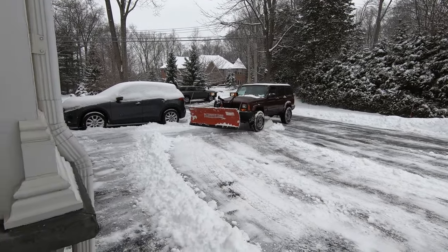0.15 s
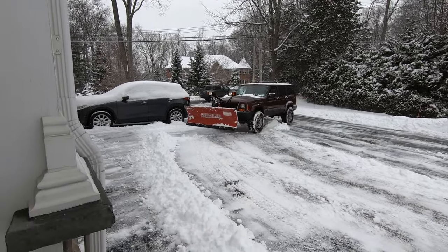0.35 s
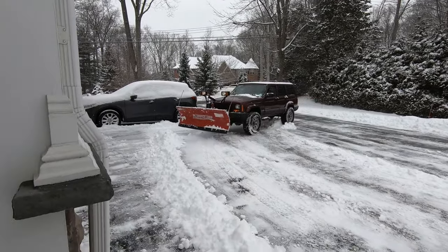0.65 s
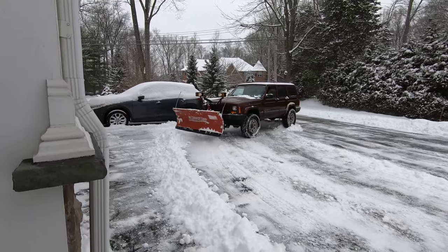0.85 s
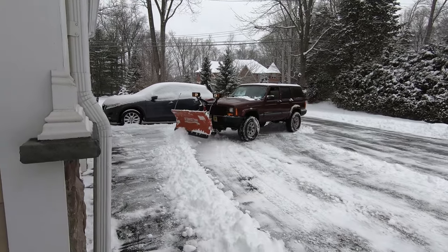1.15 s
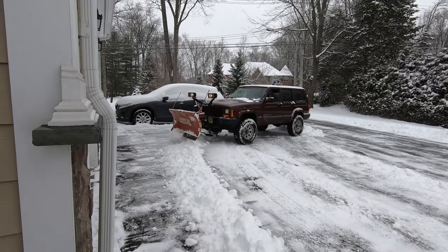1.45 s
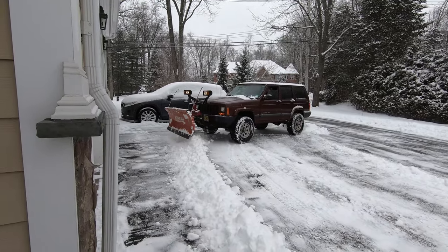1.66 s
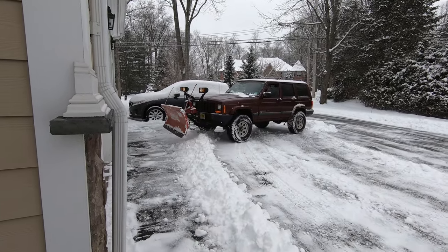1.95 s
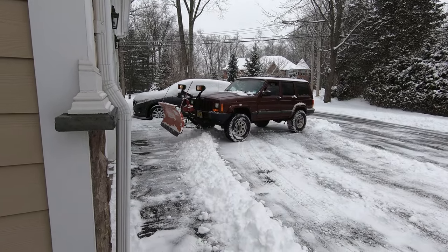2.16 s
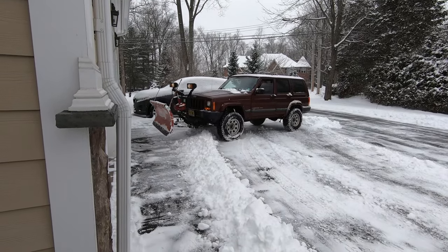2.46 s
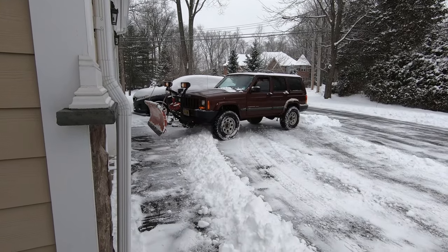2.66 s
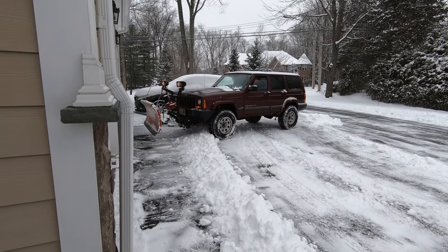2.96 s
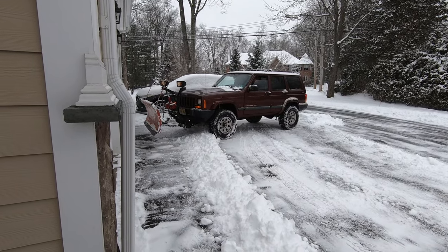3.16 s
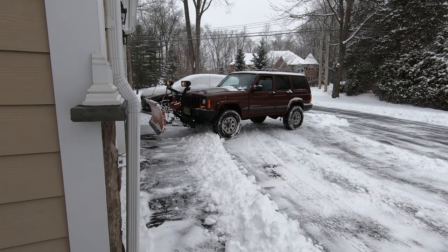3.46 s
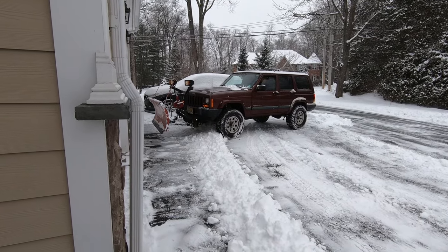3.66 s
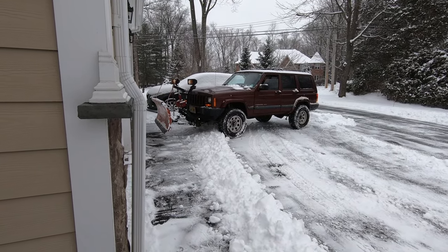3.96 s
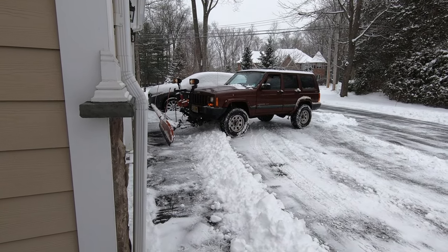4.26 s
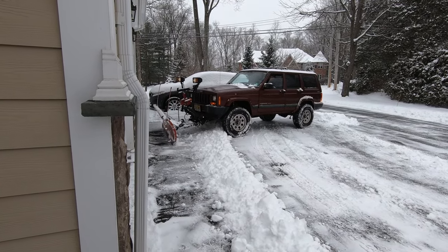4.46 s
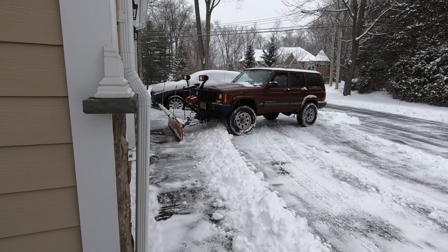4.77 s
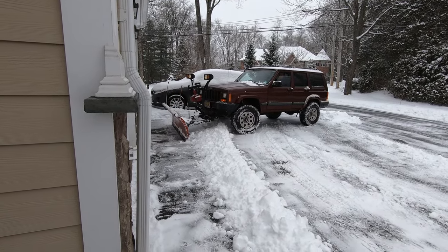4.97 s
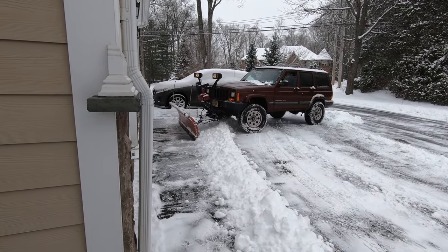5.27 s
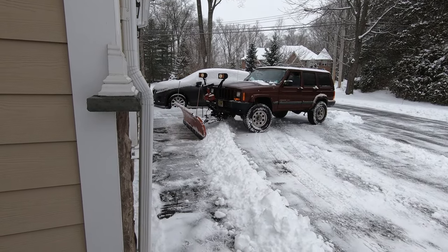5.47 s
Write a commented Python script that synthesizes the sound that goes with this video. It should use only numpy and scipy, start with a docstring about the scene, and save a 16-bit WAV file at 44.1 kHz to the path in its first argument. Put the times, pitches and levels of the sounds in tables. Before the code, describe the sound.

Outdoors in a snowy yard, heard from some metres away near a house wall: an old four-wheel drive booms and flutters, tyres hissing and crackling on snow. Loose metal knocks come in a cluster, then again after a brief pump whine. A calmer low idle follows. Finally the plow blade drops with a heavy thud and clang, and the engine pulls harder over rough, ringing scraping with repeated bumps.

```python
"""An exhaust booms and sags as a four-wheel drive with a front plow creeps up a snowy driveway.
Belts, intake and steering pump whine over hissing tyres, and the raised plow clunks in its mount. Then the
steel blade drops with a crunch of packed snow, and the engine pulls harder as the edge scrapes and judders.
Exhaust and whines are sine waves, most of them tied to the turning shaft; blows ring as fading sines;
rolling, crunching and scraping are random noise shaped by colours and resonances."""
import sys
import numpy as np
from scipy import signal
from scipy.fft import rfft, irfft, next_fast_len
from scipy.io import wavfile
from scipy.ndimage import uniform_filter1d, map_coordinates

SR = 44100
rng = np.random.default_rng(int(sys.argv[2]) if len(sys.argv) > 2 else 0)


def log_audio(samples):
    """Write samples as a 16-bit WAV file to the path given in sys.argv[1]."""
    # one column per channel
    frames = np.atleast_2d(samples).T
    # limit to full scale, then quantise
    limited = np.clip(frames, -1, 1)
    pcm = np.round(limited * 32767).astype(np.int16)
    wavfile.write(sys.argv[1], SR, pcm)


N = 247842

# In these tables a dB level is relative: the layer's own function may trim it.
# "Fade time" is the time to fall by 60 dB. A "colour" is a noise spectrum.

# Space and stereo.
# How alike left and right are. Each row: pitch in Hz, likeness (1 is identical).
STEREO_LIKENESS = [(300, .99), (500, .84), (1000, .82), (2200, .95), (4000, .72), (8000, .25)]
# Stereo balance. Each row: pitch in Hz, left minus right in dB.
BALANCE = [(100, -.35), (280, -.4), (600, 1.3), (1200, -.4), (2300, .7), (4500, -3), (8000, -1.5),
           (12000, 0)]
# Echo of the yard. Each row: pitch in Hz, fade time in seconds.
YARD_FADE = [(150, 0.89), (1500, 0.21), (9000, 0.084)]
YARD_DB = -35.5
TOP_HZ = 10600  # almost nothing passes above this

# Rolling and engine noise.
# Levels while driving. Each row: time in seconds, engine bay in dB, tyre hiss in dB, exhaust burble in dB.
ROLLING_LEVELS = [(0.03, -47, -61.5, -51.5), (0.27, -44.5, -57.5, -51), (0.64, -47, -61.5, -47),
                  (0.86, -46, -58.5, -45), (1.15, -43.5, -54.5, -51), (1.36, -42.5, -54.5, -44.5),
                  (1.67, -45.5, -57, -46.5), (1.91, -48, -62.5, -45.5), (2.37, -50.5, -65, -51),
                  (3.2, -54.5, -68, -58.5), (3.86, -54, -67, -53), (4.36, -49.5, -60, -54),
                  (5.3, -48, -57.5, -39.5)]
BAY_DB, TYRES_DB, BURBLE_DB = 1, 2.5, 11.5  # added to those three columns
# Colour of the exhaust's gas puffs. Each row: pitch in Hz, level in dB per Hz.
BURBLE_COLOUR = [(22, -7), (45, 0.5), (100, 1), (160, -1), (230, -0.5), (300, -17), (380, -21.5),
                 (460, -29.5), (620, -15), (1200, -63.5)]
# Colour of the engine bay's clatter. Each row: pitch in Hz, level in dB per Hz.
BAY_COLOUR = [(230, -25.5), (350, -11.5), (450, -3.5), (560, -3.5), (720, -2.5), (950, -6.5), (1350, -7),
              (1750, -6.5), (2200, -13), (2750, -10.5), (3500, -13.5), (4500, -26.5), (6500, -43),
              (11000, -98)]
# Colour of tyres on snow. Each row: pitch in Hz, level in dB per Hz.
TYRE_COLOUR = [(2500, -34.5), (3600, -5), (5000, -7), (7200, -5), (8200, -14.5), (9500, -21.5),
               (11000, -34.5), (15000, -49)]
# Resonances of the air box. Each row: pitch in Hz, width in Hz, level in dB.
AIR_BOX = [(439, 53, 4.5), (537, 27, -7.5)]
INTAKE_DB = -55.5
# Small cracks under the tyres: how many a second, level over the hiss column, random scatter.
CRUMBLE_HZ, CRUMBLE_DB, CRUMBLE_SPREAD_DB = 4.5, 1.5, 2

# Engine speed and exhaust.
# Speed of the crankshaft. Each row: time in seconds, turns per second.
CRANK_SPEED = [(0.0, 25.96), (0.22, 25.52), (0.44, 28.84), (0.73, 25.2), (1.01, 21.49), (1.53, 21.43),
               (2.15, 19.68), (3.33, 19.19), (3.49, 18.3), (3.69, 18.77), (3.83, 21.12), (3.99, 22.46),
               (4.2, 21.84), (4.34, 22.75), (4.61, 26.83), (5.29, 27.67), (5.62, 29.23)]
WAVER = 0.0021  # the engine speed wavers by this share
# The note depends on engine speed. An order is a multiple of that speed.
# Each row: turns per second, order 2 in dB, order 3 in dB, order 4 in dB, overtones in dB.
EXHAUST_NOTE = [(19.4, -39.5, -66.5, -15.5, -42.5), (18.35, -45.5, -55, -13, -42),
                (21.37, -27, -56.5, -21.5, -36), (21.54, -33.5, -34.5, -22, -38.5),
                (24.45, -31.5, -27.5, -30, -38.5), (29.3, -20, -29.5, -31, -45.5)]
# What pushing snow adds. One number in dB for each of: order 2, order 3, order 4, overtones.
LOAD_BOOST_DB = [-4.5, 0, 7, -2.5]
LOAD_AT_S, LOAD_RISE_S = 4.315, 0.21  # the engine takes up the load of the blade
SURGE_DB = 0.3845  # order 2 swells as the engine picks up: dB per turn per s gained each second
# Uneven firing shakes the low orders. One number in dB for each of: order 2, order 3, order 4.
UNEVEN_FIRING_DB = [.8, 1.6, .4]
PULSE_SKEW = .8  # lean of the exhaust pulse, shared by its low orders, in radians
# Higher exhaust tones. Each row: multiple of the crank speed, level in dB.
EXHAUST_OVERTONES = [(3.5, 0.5), (4.5, -10), (5, 1), (6, 1), (7, -21.5), (8, -0.5), (9, -7.5), (10, 0.5),
                     (11, -10), (12, -4), (13, -5.5)]
# Resonances of the silencer. Each row: pitch in Hz, level in dB.
SILENCER = [(95, -2), (112, 3), (130, -7.5), (155, 1.5), (178, 4), (215, -10), (260, -17)]

# Whines of engine and steering pump.
# Whines tied to the crank: three from the belt drive, and the intake's hum at 24 times crank speed.
# Each row: pitch as a multiple of the crank speed, level in dB.
CRANK_WHINES = [(71.8, 0), (68.7, -8), (42.5, -1), (24, 0)]
# Resonances that make these whines louder. Each row: pitch in Hz, level in dB over the bay column.
WHINE_RESONANCES = [(425, -8), (442, 5), (462, -9), (600, -14), (665, -7), (800, -17), (980, -15),
                    (1130, -8), (1270, -2), (1345, -1.5), (1415, -7.5), (1570, -8), (1710, 1.5), (1860, 0),
                    (2050, -6.5)]
# How these whines come and go. Each row: time in seconds, level in dB.
WHINE_LEVELS = [(0, 0), (.06, 1), (.09, -5), (.3, -3), (.4, 1), (.47, 0), (.53, -6), (.59, -6), (.64, 1),
                (.7, -3), (.75, 1), (.88, 2), (.96, -3), (1.15, -1), (1.5, -4), (2, 0), (4.4, 0)]
# The steering pump during one turn of the wheel. Each row: time in seconds, pitch in Hz, level in dB.
STEERING = [(.80, 420, -70), (.84, 455, -51), (.89, 545, -49), (.92, 630, -50), (.96, 682, -48.5),
            (1.025, 744, -48.5), (1.11, 782, -46.5), (1.17, 798, -53), (1.26, 817, -55), (1.32, 808, -54),
            (1.38, 680, -46.5), (1.43, 605, -52), (1.49, 535, -55), (1.56, 450, -75), (1.6, 450, -120)]
PUMP_JITTER = .004  # the pump's pitch trembles by this share
# Resonances of the pump's hoses and bracket. Each row: pitch in Hz, level in dB.
PUMP_RESONANCES = [(430, 0), (535, 7), (620, -1), (780, -2), (880, -14), (1150, -12), (1350, -11),
                   (1440, -7), (1530, -1), (1650, -3), (1900, -17), (2150, -14), (2330, -5.5), (2480, -17),
                   (2880, -7), (3150, -10), (3400, -2), (3560, -7), (3720, -5), (3850, -14), (3940, -10),
                   (4020, -4), (4120, -5), (4300, -14)]

# The hanging plow.
# Jolts in the mount. Each row: start in seconds, thud in dB, ring in dB, rattle in dB.
CLUNK_HITS = [(.674, -20.5, -28, -41), (.738, -22, -24.5, -43), (0.771, -17, -45, -49),
              (.811, -24.5, -26.5, -36), (.859, -24.5, -42, -49), (.884, -33, -37, -48),
              (1.296, -35, -45, -39), (1.31, -26, -42, -35.5), (1.491, -17, -27, -38),
              (1.549, -29, -36.5, -43.5), (4.002, -31, -38, -41.5)]
# Tones of the mount. Each row: pitch in Hz, level in dB, fade time in seconds.
MOUNT_TONES = [(339, -10.5, 0.19), (449, -2, 0.15), (541, -1, 0.12), (652, -4.5, 0.07), (722, -10, 0.15),
               (1130, -8, 0.042)]
# Tones of the lift arm. Each row: pitch in Hz, level in dB, fade time in seconds.
ARM_TONES = [(151, -6, 0.08), (242.4, 0.5, .14), (289.6, -9, 0.091)]
# Colour of loose pins. Each row: pitch in Hz, level in dB per Hz.
RATTLE_COLOUR = [(400, -8.5), (650, 2.5), (1100, 0), (2000, -8.5), (3100, -12), (4500, -20.5), (9000, -38)]
# Cracking crusts of snow. Each row: start in seconds, level in dB.
CRUST_CRACKS = [(0.21, -38), (.8444, -46), (1.4594, -42.5), (1.935, -44.5), (2.102, -44), (2.276, -40.5),
                (2.866, -54), (3.346, -47.5), (3.54, -49), (4.042, -48), (4.5583, -31), (4.572, -35.5),
                (4.588, -39)]
# Colour of a breaking crust. Each row: pitch in Hz, level in dB per Hz.
CRACK_COLOUR = [(1500, -11), (2700, 8.5), (3700, 3), (5000, -8), (7200, -2), (9000, -17.5), (11000, -34),
                (15000, -58)]
# Squeaks of steel joints. Each row: middle in seconds, pitch in Hz, peak level in dB, half length in seconds.
JOINT_SQUEAKS = [(.847, 3660, -48.5, 0.0082), (1.307, 3000, -44, 0.013), (3.61, 3750, -53.5, 0.02),
                 (4.042, 6300, -56, 0.0082), (4.462, 7230, -34.5, 0.013), (4.479, 5040, -35, 0.01)]

# The blade lands.
# Contacts as it lands and settles.
# Each row: start in seconds, thud in dB, clang in dB, crunch in dB, fade time of clang and crunch in seconds.
LANDING_HITS = [(4.406, -27.5, -18, -48, 0.13), (4.4116, -2, -22.5, -39, 0.33),
                (4.424, -13, -35.5, -42, 0.082), (4.441, -22, -27.5, -34, 0.14),
                (4.453, -32, -36.5, -35.5, 0.13), (4.473, -14.5, -25, -32, .1),
                (4.482, -36, -27, -35.5, 0.066)]
# Tones of the plow frame. Each row: pitch in Hz, level in dB, fade time in seconds.
FRAME_TONES = [(131, -3, .05), (166, -16.5, .3), (171, -12, .11), (214, -8, .3), (235, -10.5, .26),
               (283, -4.5, .09), (347, -23, .34), (392, -31, .35), (483, -28, .14), (622, -23, .25),
               (670, -28, .3), (1170, -29, .15), (1400, -28, .2)]
THUD_ATTACK_S = .0026  # the frame's blows are cushioned by snow
# Colour of crushed snow. Each row: pitch in Hz, level in dB per Hz.
CRUNCH_COLOUR = [(500, -39), (1500, 2), (3000, 0), (5000, -4), (6300, -8), (7500, -11), (9500, -19.5),
                 (11000, -32), (15000, -37)]
# Colour of the loose lift arm's rattle. Each row: pitch in Hz, level in dB per Hz.
LINKAGE_COLOUR = [(130, -15), (240, 3), (330, -4), (480, -4), (680, -9), (1200, -31.5), (3000, -49),
                  (8000, -103)]
# Resonances of the steel blade. Each row: pitch in Hz, width in Hz, level in dB.
BLADE_BODY = [(510, 22, -11), (620, 22, -7), (654, 18, 2), (720, 30, -6), (790, 26, -3), (875, 18, -2),
              (924, 18, -3), (987, 18, -4), (1033, 16, -4), (1119, 16, -6), (1241, 20, -8), (1332, 20, -11),
              (1455, 40, -13)]
# Resonances of its cutting edge. Each row: pitch in Hz, width in Hz, level in dB.
EDGE_BODY = [(1818, 30, -11), (1960, 30, -13), (2230, 30, 0), (2560, 60, -11), (2680, 80, -8),
             (3020, 36, -6), (3310, 50, -10)]
# Colour of steel grinding on grit. Each row: pitch in Hz, level in dB per Hz.
GRIND_COLOUR = [(400, -14), (560, -4), (660, 2), (900, -6.5), (1250, -7), (1850, -11.5), (2200, -14),
                (2390, -24), (2550, -11), (2800, -14), (3400, -17), (4200, -24.5), (5500, -33),
                (7000, -33.5), (10000, -69.5), (14000, -88)]

# The edge snags and scrapes.
# Snags on ridges of ice. Each row: start in seconds, thump in dB, bite in dB.
ICE_SNAGS = [(4.846, -42, -23.5), (4.86, -19, -37.5), (4.905, -21, -23), (4.95, -28, -28), (5.05, -23, -26),
             (5.097, -16, -22.5), (5.137, -31, -20), (5.199, -24, -22), (5.221, -18, -28.5),
             (5.28, -24.5, -25.5), (5.325, -20, -21.5), (5.36, -19, -23), (5.408, -18, -27),
             (5.43, -19, -24), (5.478, -19, -29), (5.588, -24, -23)]
SNAG_S = 0.072  # fade time of a bite
# How hard the edge bears on the pavement. Each row: time in seconds, scrape in dB, judder in dB.
EDGE_PUSH = [(4.44, -100, -100), (4.47, -35.5, -28), (4.56, -34.5, -25.5), (4.68, -40, -37),
             (4.83, -42.5, -39), (4.856, -29.5, -32.5), (4.895, -31, -30.5), (4.907, -27, -27.5),
             (5.01, -28.5, -32.5), (5.116, -26.5, -28.5), (5.2, -26.5, -26), (5.28, -27, -22.5),
             (5.37, -24, -24.5), (5.45, -26.5, -25.5), (5.5, -31, -26), (5.54, -32.5, -39.5),
             (5.582, -42.5, -38), (5.59, -28, -32)]
# The edge's ring: its level at full scrape, that scrape level, dB gained per dB of scrape.
EDGE_DB, EDGE_FULL_DB, EDGE_GROWS = -33.5, -23, 0.76
# The contact slides along the edge. Each row: time in seconds, share of the blade's ring in its upper modes.
CONTACT_SHARE = [(4.5, .35), (4.92, .3), (5.02, .6), (5.14, .78), (5.3, .75), (5.38, .55), (5.5, .45),
                 (5.62, .35)]
UPPER_HZ = 760  # the blade's upper modes start here
RING_DB = -1.5  # the blade's ring over the scrape level
# As the contact moves, resonances swell and fade, and shift in pitch by this share.
WANDER_DB, DRIFT = 2.2, .004
# Stones under the edge: how many a second, level over the scrape, random scatter, decay constant.
GRIT_HZ, GRIT_DB, GRIT_SPREAD_DB, GRIT_S = 130, -6, 3.5, .0025
# Resonances of the juddering frame. Each row: pitch in Hz, width in Hz, level in dB.
JUDDER_BODY = [(128, 22, -7.5), (160, 25, -0.5), (205, 19, -0.5), (242, 20, -2), (266.8, 13, 1),
               (350, 39, -11.5)]
# Loose snow slides up the blade before it digs in.
SKIM_S, SKIM_LENGTH_S, SKIM_FADE_S, SKIM_DB = 4.47, 0.32, 0.2, -40
# Colour of sliding snow. Each row: pitch in Hz, level in dB per Hz.
SNOW_COLOUR = [(500, 5), (800, 1), (1600, 2), (2350, -7), (2750, 3.5), (3300, -7), (4200, -17),
               (5500, -20.5), (7000, -19.5), (9500, -39), (14000, -56)]


def amp(db):
    """Turn decibels into a multiplier."""
    return 10 ** (np.asarray(db) / 20)


def unit(x):
    """Scale to an average strength (rms) of 1."""
    return x / np.sqrt(np.mean(x ** 2) + 1e-20)


def along(points, hz):
    """Read between (Hz, value) points, with pitch on a log scale."""
    f, v = np.transpose(points)
    return np.interp(np.log(hz + 1), np.log(f + 1), v)


def clock():
    """The time of each sample in seconds."""
    return np.arange(N) / SR


def curves(rows):
    """One line of values, straight between rows, for each column after the time."""
    s, *cols = np.transpose(rows)
    return [np.interp(clock(), s, c) for c in cols]


def wobble(rate):
    """A smooth random curve of rms 1, through `rate` random points a second."""
    return unit(map_coordinates(rng.standard_normal(int(N * rate / SR) + 4), [clock() * rate]))


def angle(hz):
    """Running phase of a changing frequency, in radians."""
    return 2 * np.pi * np.cumsum(hz) / SR


def filtered(x, response):
    """Multiply the spectrum of x by a response, with spare room for the ringing."""
    m = next_fast_len(N + SR // 2)
    return irfft(rfft(x, m) * response(np.fft.rfftfreq(m, 1 / SR)), m)[..., :N]


def colour(points):
    """Response of a (Hz, dB) spectrum, falling away below its first point."""
    return lambda f: amp(along(points, f)) * np.minimum(f / points[0][0], 1) ** 2


def body(modes):
    """Response of an object that resonates at each (Hz, width, dB), with alternating signs."""
    def response(f):
        total = 0
        for k, (centre, width, db) in enumerate(modes):
            resonance = 1j * f * width / (centre * centre - f * f + 1j * f * width)
            total = total + (-1) ** k * amp(db) * resonance
        return total
    return response


def shaken(response, force):
    """Random contact shakes a body; the stereo output has the rms of the force."""
    size = np.sqrt(np.mean(np.abs(response(np.fft.rfftfreq(SR, 1 / SR))) ** 2))
    drive = rng.standard_normal((2, N)) * force / size

    def shared_and_wide(f):
        turn = np.arccos(np.clip(along(STEREO_LIKENESS, f), -1, 1)) / 2
        return response(f) * np.array([np.cos(turn), np.sin(turn)])

    mid, side = filtered(drive, shared_and_wide)
    return np.array([mid + side, mid - side])


def blow(s, t60, attack):
    """Loudness of a contact at time s: a quick rise, then an even fall in dB."""
    t = np.maximum(clock() - s, 0)
    return amp(-60 * np.minimum(t / t60, 3)) * (1 - np.exp(-t / attack))


def held(s, length, attack, release):
    """Loudness that rises at time s, holds until `length` has passed, then dies away."""
    t = clock() - s
    return np.clip(t / attack, 0, 1) * np.exp(-np.maximum(t - length, 0) / release)


def struck(modes, s, attack):
    """(Hz, dB, fade time) tones ringing after a blow at time s, each at a new strength."""
    t = np.arange(SR) / SR
    ring = 0
    for k, (hz, db, t60) in enumerate(modes):
        fading_db = db + rng.normal(0, 1) - 60 * t / t60
        ring = ring + (-1) ** k * amp(fading_db) * np.sin(2 * np.pi * hz * t)
    return np.pad(ring * (1 - np.exp(-t / attack)), (round(s * SR), N))[:N]


def ragged(phase, rate):
    """A tone that flutters in strength and phase, as if heard over several shifting paths."""
    flutter = wobble(rate) * np.sin(phase) + wobble(rate) * np.cos(phase)
    return .7 * np.sin(phase) + .5 * flutter


def yard(x):
    """House walls and trees return a short, thin tail of fading noise."""
    hz, t, z = signal.stft(rng.standard_normal((2, SR // 2)), SR, nperseg=256)
    fade = amp(-60 * t / along(YARD_FADE, hz)[:, None])
    tail = signal.istft(z * fade, SR, nperseg=256)[1]
    return signal.fftconvolve(x, tail / np.linalg.norm(tail[0]), axes=1)[:, :N]


def running(crank):
    """Gas puffs, intake noise and valve clatter follow the shaft; tyres hiss and crumble through grainy snow."""
    bay_db, hiss_db, burble_db = curves(ROLLING_LEVELS)
    puffs = unit(1 + 0.68 * np.cos(2 * crank))
    clatter = unit(1 + 0.066 * np.cos(4 * crank) + 0.068 * np.cos(crank))
    burble = shaken(colour(BURBLE_COLOUR), amp(burble_db + BURBLE_DB) * puffs)
    intake = shaken(body(AIR_BOX), amp(INTAKE_DB) * puffs)
    bay = shaken(colour(BAY_COLOUR), amp(bay_db + BAY_DB + 0.61 * wobble(15)) * clatter)
    grains = unit(amp(1.1 * wobble(350)))
    tyres = shaken(colour(TYRE_COLOUR), amp(hiss_db + TYRES_DB) * grains)

    crumbs = 0
    for s in np.cumsum(rng.exponential(1 / CRUMBLE_HZ, size=20)):
        strength = amp(rng.normal(CRUMBLE_DB, CRUMBLE_SPREAD_DB))
        crumbs = crumbs + strength * blow(s, t60=0.055, attack=.0006)
    crumble = shaken(colour(TYRE_COLOUR), amp(hiss_db) * crumbs)
    return burble + intake + bay + tyres + crumble


def exhaust(speed, crank):
    """Low orders throb together once a turn; overtones slide through the silencer's resonances."""
    load = np.clip((clock() - LOAD_AT_S) / LOAD_RISE_S, 0, 1)
    pickup = uniform_filter1d(np.gradient(speed) * SR, size=SR // 8)  # turns per s gained each second
    turns, *parts = np.transpose(EXHAUST_NOTE)
    levels = [np.interp(speed, turns, part) + db * load for part, db in zip(parts, LOAD_BOOST_DB)]
    two_db, three_db, four_db, over_db = levels
    orders_db = (two_db + SURGE_DB * pickup, three_db, four_db)

    boom = 0
    for k, (db, uneven) in enumerate(zip(orders_db, UNEVEN_FIRING_DB), 2):
        boom = boom + amp(db + uneven * wobble(16)) * np.sqrt(2) * np.cos(k * crank + PULSE_SKEW)

    upper = 0
    for k, db in EXHAUST_OVERTONES:
        level = amp(db + along(SILENCER, k * speed) + 0.34 * wobble(4.2))
        upper = upper + level * np.sqrt(2) * np.sin(k * crank + rng.uniform(0, 2 * np.pi))
    return boom + amp(over_db - 2.0) * upper


def whines(speed, crank):
    """Belt drive and intake tones follow the crank; the steering pump's tone climbs and falls in the turn."""
    whine_db = curves(ROLLING_LEVELS)[0] + curves(WHINE_LEVELS)[0]
    crank_tones = 0
    for k, db in CRANK_WHINES:
        level = amp(whine_db + db + along(WHINE_RESONANCES, k * speed))
        crank_tones = crank_tones + level * ragged(k * crank + .5 * wobble(60), rate=120)

    pump_hz, pump_db = curves(STEERING)
    vanes = angle(pump_hz * (1 + PUMP_JITTER * wobble(140)))
    pump = 0
    for k in range(1, 6):  # harmonics flare as they glide through resonances
        level = amp(pump_db + along(PUMP_RESONANCES, k * pump_hz))
        pump = pump + level * np.sqrt(2) * ragged(k * vanes, rate=70)
    return crank_tones + pump


def jolts():
    """Blows ring the hanging plow's arm and mount, pins rattle, joints squeak and snow crusts crack."""
    clunks, pins = 0, 0
    for s, thud_db, ring_db, rattle_db in CLUNK_HITS:
        clunks = clunks + amp(thud_db - 7.5) * struck(ARM_TONES, s, attack=0.005)
        clunks = clunks + amp(ring_db - 6.5) * struck(MOUNT_TONES, s, attack=0.0008)
        pins = pins + amp(rattle_db) * blow(s, t60=0.091, attack=0.00073)
    rattle = shaken(colour(RATTLE_COLOUR), pins * unit(amp(3.1 * wobble(250))))

    breaking = sum(amp(db - 3.5) * blow(s, t60=0.074, attack=.0006) for s, db in CRUST_CRACKS)
    cracks = shaken(colour(CRACK_COLOUR), breaking)

    squeaks = 0
    for s, hz, db, half in JOINT_SQUEAKS:
        swell = np.exp(-((clock() - s) / half) ** 2)
        squeaks = squeaks + amp(db) * swell * np.sin(angle(hz * (1 + 0.0088 * wobble(330))))
    return clunks + rattle + cracks + squeaks


def landing():
    """Each contact thumps the frame, rattles the blade and crushes snow under the edge."""
    thud, clang, crunch = 0, 0, 0
    for s, thud_db, clang_db, crunch_db, t60 in LANDING_HITS:
        thud = thud + amp(thud_db) * struck(FRAME_TONES, s, attack=THUD_ATTACK_S)
        contact = blow(s, t60, attack=0.0022)
        clang = clang + amp(clang_db) * contact
        crunch = crunch + amp(crunch_db) * contact
    steel = shaken(body(BLADE_BODY + EDGE_BODY), amp(-20.0) * clang)
    grind = shaken(colour(GRIND_COLOUR), amp(-3.5) * clang)
    linkage = shaken(colour(LINKAGE_COLOUR), amp(-3.5) * clang)  # the loose lift arm, dull and broad
    snow = shaken(colour(CRUNCH_COLOUR), amp(2.5) * crunch * unit(amp(2 * wobble(630))))
    return thud + steel + grind + linkage + snow


def snags():
    """Each ridge of ice thumps the lift arm and makes the edge bite and ring."""
    thumps = sum(amp(db - 1) * struck(ARM_TONES, s, attack=0.0028) for s, db, _ in ICE_SNAGS)
    bites = sum(amp(db) * blow(s, SNAG_S, attack=.0015) for s, _, db in ICE_SNAGS)
    grind = shaken(colour(GRIND_COLOUR), amp(-2.5) * bites)
    edge = shaken(body(EDGE_BODY), amp(-8.5) * bites)
    return thumps + grind + edge


def stones():
    """Force of single stones breaking under the edge at random moments, rms 1."""
    strengths = amp(GRIT_SPREAD_DB * np.clip(rng.standard_normal(N), -2, 2))
    hits = (rng.random(N) < GRIT_HZ / SR) * strengths
    return unit(signal.lfilter([1], [1, -np.exp(-1 / (GRIT_S * SR))], hits))


def ringing(force):
    """The blade's lower and upper modes trade strength as the contact point moves."""
    share, = curves(CONTACT_SHARE)
    lower = body([mode for mode in BLADE_BODY if mode[0] < UPPER_HZ])
    upper = body([mode for mode in BLADE_BODY if mode[0] >= UPPER_HZ])
    return shaken(lower, force * np.sqrt(1 - share)) + shaken(upper, force * np.sqrt(share))


def wandering(x):
    """Narrow bands of x swell and fade on their own while its pitch drifts a little."""
    z = signal.stft(x, nperseg=2048)[2]
    field = uniform_filter1d(rng.standard_normal(z.shape[1:]), size=3, axis=0)
    field = unit(uniform_filter1d(field, size=5, axis=1))
    streaked = signal.istft(z * amp(WANDER_DB * field), nperseg=2048)[1][:, :N]
    wave = wobble(7)
    lag = DRIFT * wave / np.std(np.diff(wave))  # reading early or late bends the pitch
    return np.array([map_coordinates(side, [np.arange(N) + lag]) for side in streaked])


def scraping():
    """The edge grinds over dense grit, ringing blade and frame, while snow slides up its face."""
    scrape_db, judder_db = curves(EDGE_PUSH)
    slips = 1.3 * wobble(170) + 0.76 * wobble(30)

    def grains():  # each part of the edge bites on its own
        return unit(amp(slips + 1.5 * wobble(900)))

    ring = ringing(amp(scrape_db + RING_DB) * grains())
    edge_db = EDGE_DB + EDGE_GROWS * (scrape_db - EDGE_FULL_DB)
    edge = shaken(body(EDGE_BODY), amp(edge_db) * grains())
    grit = shaken(colour(GRIND_COLOUR), amp(scrape_db - 6.0) * grains())
    grit = grit + shaken(colour(GRIND_COLOUR), amp(scrape_db + GRIT_DB) * stones())
    frame = shaken(body(JUDDER_BODY), amp(judder_db - 2.5) * unit(amp(1.5 * slips)))
    skim = amp(SKIM_DB) * held(SKIM_S, SKIM_LENGTH_S, SKIM_FADE_S, SKIM_FADE_S)
    snow = shaken(colour(SNOW_COLOUR), skim * unit(amp(3.4 * wobble(200))))
    return wandering(ring + grit + snow) + edge + frame


def scene():
    """Engine, tyres, whines and plow together; the plow and whines also echo in the yard."""
    speed, = curves(CRANK_SPEED)
    crank = angle(speed * (1 + WAVER * wobble(14)))
    plow_and_whines = whines(speed, crank) + jolts() + landing() + snags() + scraping()
    echo = amp(YARD_DB) * yard(plow_and_whines)
    return running(crank) + exhaust(speed, crank) + plow_and_whines + echo


def record(dry):
    """Left and right differ a little in colour; a steep cut removes the highest treble."""
    def response(f):
        sides = amp(along(BALANCE, f) * np.array([[.5], [-.5]]))
        return sides / np.sqrt(1 + (f / TOP_HZ) ** 40)
    return filtered(dry, response)


dry = scene()
out = record(dry)
log_audio(out)
```